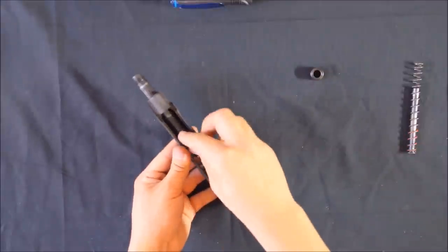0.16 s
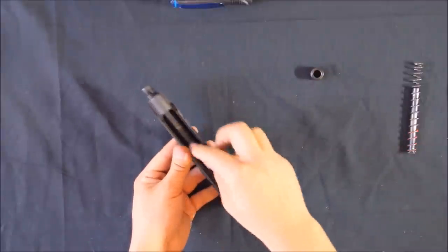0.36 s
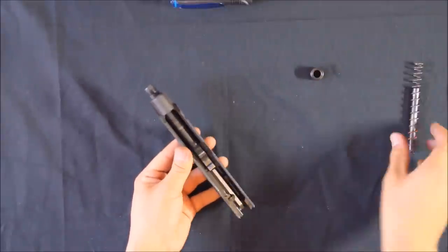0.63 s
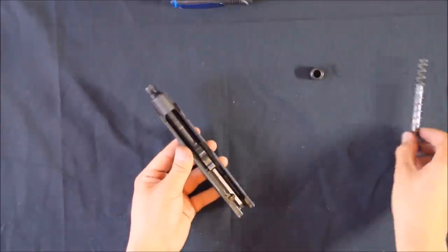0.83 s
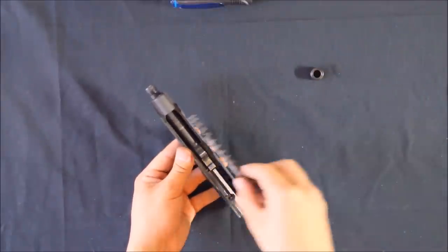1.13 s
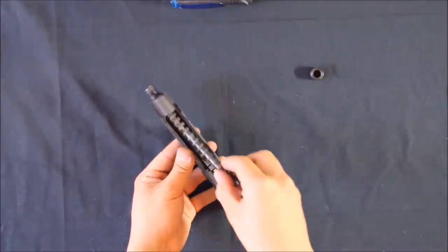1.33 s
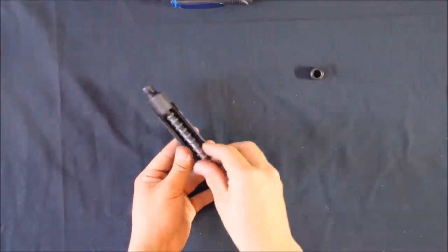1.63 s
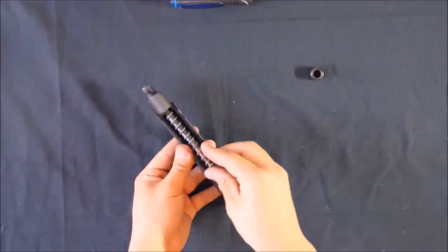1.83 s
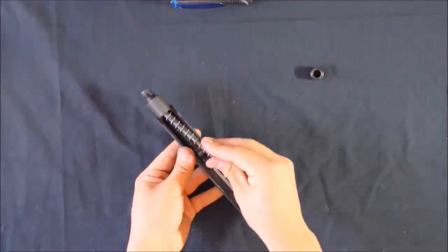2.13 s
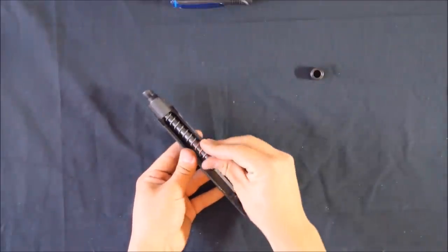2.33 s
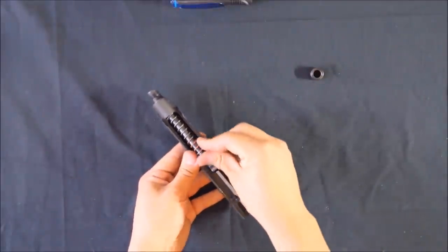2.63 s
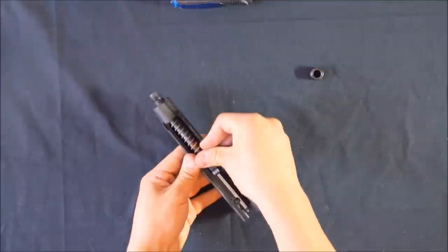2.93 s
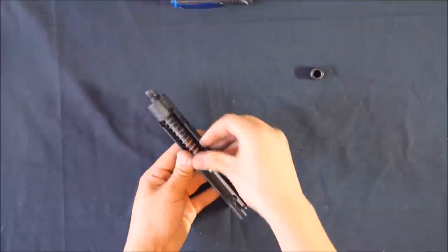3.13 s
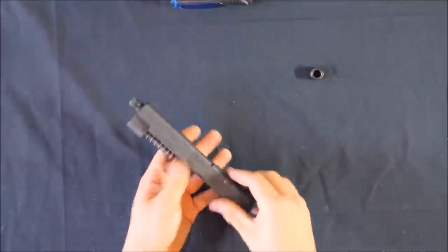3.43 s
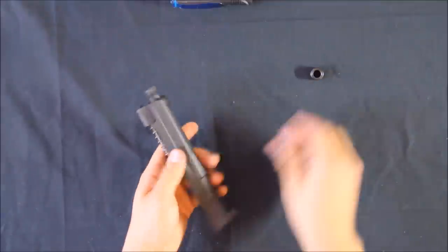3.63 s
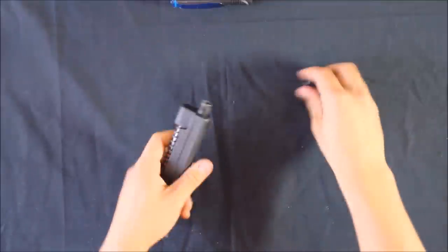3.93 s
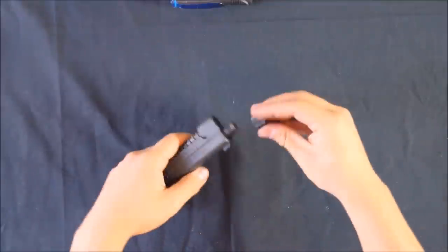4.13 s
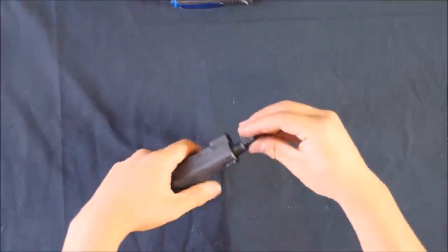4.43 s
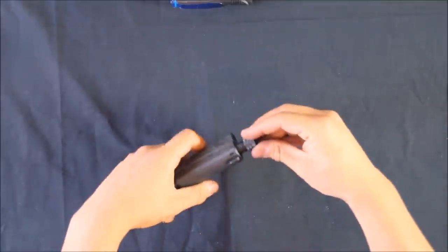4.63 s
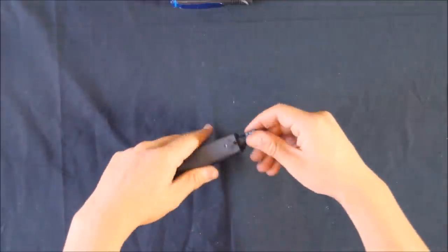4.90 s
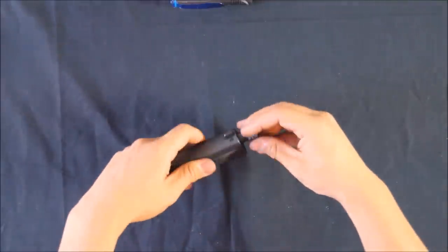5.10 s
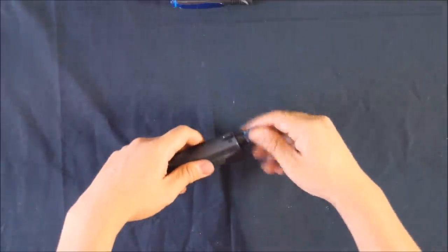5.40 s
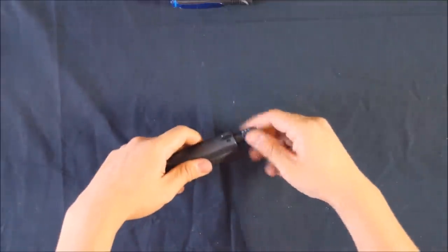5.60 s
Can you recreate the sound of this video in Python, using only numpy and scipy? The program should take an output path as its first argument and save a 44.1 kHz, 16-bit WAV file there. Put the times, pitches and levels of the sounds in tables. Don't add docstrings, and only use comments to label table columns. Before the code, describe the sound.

Close view of hands assembling a steel pistol slide over cloth in a small hard room. A barrel drops and seats in a loud ringing cluster, then quiet; spring scrapes and ticks, a few rod clicks, one very hard snap near three seconds, soft hand rustle, then small cap clicks and faint thread turning. One close microphone, slightly overloaded on the blows, with low room tone.

```python
import sys
import numpy as np
from scipy import signal
from scipy.fft import rfft, irfft, next_fast_len
from scipy.io import wavfile
from scipy.ndimage import uniform_filter1d, map_coordinates

SR = 44100
rng = np.random.default_rng(int(sys.argv[2]) if len(sys.argv) > 2 else 0)


def natural_amplitude(level_db):
    exponent = np.asarray(level_db, float) / 20
    return 10 ** exponent


def wav_out(sig):
    wavfile.write(sys.argv[1], SR, np.round(np.clip(np.atleast_2d(sig).T, -1, 1) * 32767).astype(np.int16))


N = 254016
SPAN = 1 << 14
HZ = np.fft.rfftfreq(SPAN, 1 / SR)

# start in s, peak in dB, tilt in dB, ring in dB.
EARLIER_KNOCK = [
    (-0.063, -13, 0, 7),
]
# start in s, peak in dB, tilt in dB, ring in dB.
BARREL_DROP_HITS = [
    (.1215, -8, 1, 5),
    (.1270, -10.5, 3.5, 13.5),
    (.1505, -27, 1.5, 14),
]
# start in s, peak in dB, tilt in dB, ring in dB.
BARREL_SEAT_HITS = [
    (0.296, -32.5, -3, -2),
    (.3010, -31.5, -4, 0.5),
    (.3040, -15, 0.5, 13.5),
    (.308, -16, 11, 5.5),
    (0.3119, -3.5, 0.1, 10),
    (.317, -9.5, 0.5, 9),
    (0.3247, -6, 0.5, 10),
    (0.370, -20, -5.5, 14),
]
# start in s, peak in dB, tilt in dB, ring in dB.
BARREL_KNOCK_HITS = [
    (.255, -42, -5.5, -6),
    (.4897, -29, 0.5, 6),
    (.504, -37, -5, -19),
    (.553, -47, -3, 2),
]
# start in s, peak in dB, tilt in dB, ring in dB.
SPRING_HITS = [(1.36, -38, 25, 10), (1.3724, -39, 8, 11), (1.4701, -42.5, -6, 10), (1.5198, -45, -4, 10),
               (1.5541, -34, 4, -9), (1.5821, -36, 16, -8), (1.5915, -30, 4, 0)]
# start in s, peak in dB, tilt in dB, ring in dB.
COIL_HITS = [
    (1.7015, -34.5, -2, -4),
    (1.8771, -29, 2.5, -5),
    (1.9558, -39.5, -5.5, -2),
]
# start in s, peak in dB, tilt in dB, ring in dB.
ROD_TOUCH_HITS = [(1.715, -39.5, -7, 10), (2.0209, -28, 2.5, -4), (2.0324, -27.5, -7, 18),
                  (2.0586, -45, -12, 2), (2.2522, -40, -4, -7.5)]
# start in s, peak in dB, tilt in dB, ring in dB.
ROD_PUSH_HITS = [
    (2.2814, -31, -4.5, -7),
    (2.3012, -17, 0.9, 11.5),
    (2.305, -28, 5, 16),
]
# start in s, peak in dB, tilt in dB, ring in dB.
ROD_PRESS_HITS = [
    (2.4422, -35, -4, 6.5),
    (2.7134, -39, -3, -2),
    (2.717, -39, 1.5, -3),
    (2.7217, -24, -1.5, 8),
    (2.7334, -54, 2.5, -4),
]
# start in s, peak in dB, tilt in dB, ring in dB.
ROD_SLIP_HITS = [
    (2.5450, -37.5, 4, 0),
    (2.5468, -16, -3, 5),
    (2.5545, -33, -3, 4),
    (2.5916, -35, -14.5, -1.5),
]
# start in s, peak in dB, tilt in dB, ring in dB.
ROD_SNAP_HITS = [(2.8390, -20.5, -6.5, -0.5), (2.8422, -3.5, 0.5, -6.5), (2.8436, -10, -2.5, -13.5),
                 (2.8450, 4, -2, -2.5), (2.8475, -16.5, -3.5, 4), (2.8500, -3, -2, 3),
                 (2.853, -10, -0.5, 0.5)]
# start in s, peak in dB, tilt in dB, ring in dB.
CAP_HITS = [
    (4.5524, -12, 1.5, 2),
    (4.6255, -53, -2, -3),
    (4.8226, -38.5, -1, 2),
    (4.829, -48, -9, 4),
    (5.3848, -41.5, -6.5, -11),
    (5.4689, -43.5, -7, -15.5),
    (5.5907, -49, -9, -7),
]
# start in s, peak in dB, tilt in dB, ring in dB.
CAP_SCUFF_HITS = [(4.5188, -39, -2, 2), (4.5233, -41, -5, 1), (4.5285, -37, -2, 1), (4.5315, -37, -2, 3),
                  (4.535, -35, 2, 3), (4.539, -36, -9.5, 6), (4.5455, -41, -5, -2)]
# start in s, peak in dB, tilt in dB, ring in dB.
CAP_DROP_HITS = [
    (4.3013, -22, -0.5, 11),
    (4.305, -26, 2.5, -7),
]
# start in s, peak in dB, tilt in dB, ring in dB.
CAP_RATTLE_HITS = [
    (4.3881, -43, -10, 11),
    (4.4178, -36.5, -4, 10),
    (4.4265, -42, -3, 12),
    (4.4432, -34, 2.5, 13),
    (4.6365, -40, 2, 7),
]

# frequency in Hz, width in Hz, level in dB.
SPRING_RESONANCES = [(3880, 130, -30), (5810, 85, -6), (7350, 76, -10), (7970, 36, 4.5), (8580, 120, -17),
                     (9200, 53, -20), (10280, 41, -17), (11000, 48, -22), (12200, 43, -1.5),
                     (13400, 80, -3.5), (14420, 60, -11), (14740, 30, -18), (15600, 200, -16.5)]
# frequency in Hz, width in Hz, level in dB.
PUSH_RESONANCES = [(1210, 41, 0), (2375, 194, -4.5), (2842, 150, -6.5), (3805, 110, -4.5),
                   (4190, 230, -0.5), (6400, 110, -7), (4950, 100, -3), (6940, 180, -6), (7915, 50, 0.5),
                   (8850, 74, -10), (9550, 250, -10), (10120, 49, -7), (10890, 140, -10), (12070, 210, -11),
                   (14600, 100, -11), (15000, 270, -17.5)]
# frequency in Hz, width in Hz, level in dB.
THREAD_RESONANCES = [(7850, 340, -3), (8570, 47, -9), (10500, 43, -2), (12380, 64, -2), (12800, 56, -18.5),
                     (13900, 63, -4), (15300, 66, -8)]
# frequency in Hz, width in Hz, level in dB.
COIL_RESONANCES = [(15400, 300, 4), (15600, 180, 2), (9570, 97, -4), (13300, 200, -14)]
# frequency in Hz, width in Hz, level in dB.
KNOCK_RESONANCES = [(1217, 26, -0.5), (2363, 220, -19), (4250, 65, -4), (13400, 100, -24),
                    (14600, 100, -22.5)]
# frequency in Hz, width in Hz, level in dB.
TOUCH_RESONANCES = [(1790, 120, -9), (2630, 120, -7.5), (3000, 120, 0.5), (3640, 130, -2), (3940, 150, 6),
                    (5870, 100, -25), (7200, 120, -4)]
# frequency in Hz, width in Hz, level in dB.
PRESS_RESONANCES = [(2430, 276, -3.5), (2890, 220, 4), (3700, 120, -4.5), (4270, 200, 1.5), (4940, 180, -6),
                    (7600, 120, -11), (9375, 40, -13.5), (11050, 74, -8.5), (15400, 60, -7.5)]
# frequency in Hz, width in Hz, level in dB.
SCUFF_RESONANCES = [(2340, 44, -9.5), (2950, 67, 3.5), (3790, 120, -0.5), (4190, 140, -2.5),
                    (5570, 230, -13.5), (7230, 180, -11), (8190, 110, -7)]
# frequency in Hz, width in Hz, level in dB.
CAP_DROP_RESONANCES = [(2400, 38, -9), (2980, 60, -3.5), (3740, 146, -2.5), (4200, 80, -13),
                       (5470, 270, -12), (6060, 60, -9), (7100, 80, -7), (8100, 50, -9), (10200, 70, -10),
                       (12100, 120, -3), (13200, 50, -2), (14900, 80, -8)]
# frequency in Hz, width in Hz, level in dB.
RATTLE_RESONANCES = [(2400, 50, -12), (3004, 63, 3), (3580, 200, -5.5), (5940, 190, -13),
                     (7730, 300, -10.5), (12600, 130, -21)]

# frequency [Hz], width [Hz], level [dB].
DROP_MODE_HZ = [1237, 1765, 2340, 2850, 3100, 3830, 4170, 4828, 4875, 4940, 5082, 6170, 6347, 7124, 7270,
                7480, 7970, 8640, 9440, 10400, 11000, 11300, 11500, 12320, 13100, 13400, 14700, 15487]
DROP_MODE_WIDTH_HZ = [40, 30, 110, 100, 120, 50, 84, 40, 40, 45, 30, 30, 30, 40, 50, 90, 35, 45, 60, 50, 30,
                      60, 35, 70, 35, 50, 70, 40]
DROP_MODE_DB = [-27, -9, -18, -12, -12, -13, -12, -0.5, 2.5, -6, -4, -15.5, -9, -12.5, -12, -9.5, -12, -3,
                -24, -17, -15.5, -14, -17, -13, -13, -19.5, -25.5, -16]
# frequency [Hz], width [Hz], level [dB].
SEAT_MODE_HZ = [1210, 1780, 2570, 3020, 3850, 4160, 4242, 4312, 4470, 4828, 4960, 6510, 7130, 7250, 7528,
                7974, 8600, 10350, 11030, 11185, 11450, 12380, 13100, 13400, 15487]
SEAT_MODE_WIDTH_HZ = [40, 40, 80, 55, 50, 40, 34, 25, 50, 40, 60, 50, 50, 30, 36, 40, 50, 150, 60, 50, 90,
                      90, 40, 35, 35]
SEAT_MODE_DB = [-26, -20.5, -24, -20, -14.5, -12, 2, -5.5, -13.5, -11, -9, -25, -9.5, -7.5, -3, -9, -16,
                -21.5, -12, -8.5, -22, -22, -19.5, -17, -19.5]
# frequency [Hz], width [Hz], level [dB].
SNAP_MODE_HZ = [1250, 1770, 2370, 3010, 3640, 3890, 4430, 4970, 5380, 5548, 6230, 7290, 7912, 9430, 11200,
                12230, 13050, 15490]
SNAP_MODE_WIDTH_HZ = [60, 50, 150, 130, 120, 130, 150, 130, 90, 80, 150, 200, 90, 90, 200, 110, 150, 100]
SNAP_MODE_DB = [-13.5, -9, -7, -1, -12, -8, -7.5, -6, -0.5, 5, -8.5, -10, 3.5, -13, -12.5, -10.5, -8.5, -21]
# frequency [Hz], width [Hz], level [dB].
SLIP_MODE_HZ = [1200, 1600, 1765, 2030, 2336, 2560, 2815, 3172, 3350, 3745, 3980, 4200, 4955, 6170, 7200,
                7900, 8620, 11030, 12250, 13250]
SLIP_MODE_WIDTH_HZ = [40, 28, 25, 30, 90, 40, 160, 50, 50, 60, 45, 130, 90, 50, 120, 130, 50, 50, 120, 80]
SLIP_MODE_DB = [-16, -6.5, 0, -11, -6.5, -3.5, -1.5, -1, -9.5, -8.5, -7.5, -4, -8, -10.5, -17.5, -14, -24.5,
                -20, -19, -23.5]
# frequency [Hz], width [Hz], level [dB].
CAP_MODE_HZ = [2370, 3030, 3820, 4090, 4320, 6610, 7140, 7560, 9260, 10300, 11200, 12200, 13200, 14700]
CAP_MODE_WIDTH_HZ = [60, 90, 220, 60, 100, 140, 70, 80, 120, 120, 80, 220, 80, 300]
CAP_MODE_DB = [-6, -6, -1, -15, -3, -12, -18, -17, -16, -20, -11, -9, -12, -15]
# frequency [Hz], width [Hz], level [dB].
EARLIER_MODE_HZ = [1250, 2550, 2800, 2930, 4255, 4860, 6820, 7730, 8000, 8550, 11200, 13000]
EARLIER_MODE_WIDTH_HZ = [23, 80, 40, 90, 40, 300, 260, 100, 40, 60, 45, 49]
EARLIER_MODE_DB = [-11, -8.5, -9, -12, -1.5, -12.5, -15.5, -14, -16, -19, -21.5, -18.5]
DROP_RESONANCES = np.transpose([DROP_MODE_HZ, DROP_MODE_WIDTH_HZ, DROP_MODE_DB])
SEAT_RESONANCES = np.transpose([SEAT_MODE_HZ, SEAT_MODE_WIDTH_HZ, SEAT_MODE_DB])
SNAP_RESONANCES = np.transpose([SNAP_MODE_HZ, SNAP_MODE_WIDTH_HZ, SNAP_MODE_DB])
SLIP_RESONANCES = np.transpose([SLIP_MODE_HZ, SLIP_MODE_WIDTH_HZ, SLIP_MODE_DB])
CAP_RESONANCES = np.transpose([CAP_MODE_HZ, CAP_MODE_WIDTH_HZ, CAP_MODE_DB])
EARLIER_RESONANCES = np.transpose([EARLIER_MODE_HZ, EARLIER_MODE_WIDTH_HZ, EARLIER_MODE_DB])

# frequency in Hz, level in dB.
STEEL_CRACK = [(470, -95), (800, -57), (1260, -29), (2320, -13), (3420, -6), (3930, -5.5), (9940, -13),
               (12600, -12), (16000, -17)]
# frequency in Hz, level in dB.
BARREL_DROP_CRACK = [(500, -72.5), (900, -38.5), (1700, -18), (3100, -2.5), (4600, -10), (6000, -9),
                     (12000, -20.5), (16000, -42.5)]
# frequency in Hz, level in dB.
BARREL_SEAT_CRACK = [(500, -60.5), (900, -32), (1500, -15), (2600, -2), (4400, -8), (6500, -2.5),
                     (12000, -27), (16000, -29)]
# frequency in Hz, level in dB.
SPRING_BODY_CRACK = [(1500, -8.5), (3000, -28), (6000, 3), (10000, -6), (14000, 3), (16000, -16)]
# frequency in Hz, level in dB.
COIL_BODY_CRACK = [(1500, -40), (4000, -12), (10000, -16), (13000, -14), (15000, -11), (16500, 0)]
# frequency in Hz, level in dB.
ROD_TOUCH_CRACK = [(800, -50), (1500, -8), (3500, 0), (6000, 1.5), (9000, -15), (12000, -50)]
# frequency in Hz, level in dB.
ROD_SLIP_CRACK = [(470, -67), (800, -38.5), (1740, -12), (3510, -1), (3830, -5), (5580, -5), (10700, -26.5),
                  (16000, -32.5)]
# frequency in Hz, level in dB.
CAP_BODY_CRACK = [(900, -25), (1600, -54), (2400, -0.5), (3500, -8.5), (5000, -4.5), (9000, -6),
                  (16000, -12)]

# peak in seconds, length in seconds, peak in dB.
BARREL_STROKES = [
    (.385, 0.17, -31.5),
    (.47, 0.14, -45.5),
]
# peak in seconds, length in seconds, peak in dB.
SPRING_STROKES = [
    (1.376, 0.59, -57),
    (1.56, 0.11, -44),
    (1.592, 0.036, -46),
    (1.47, .06, -56),
]
# peak in seconds, length in seconds, peak in dB.
ROD_STROKES = [
    (2.3, 0.073, -41.5),
]
# peak in seconds, length in seconds, peak in dB.
CAP_STROKES = [
    (4.534, 0.051, -30.5),
]
# peak in seconds, length in seconds, peak in dB.
RATTLE_STROKES = [
    (4.432, 0.066, -45.5),
    (4.385, .16, -50.5),
]
# peak in seconds, length in seconds, peak in dB.
THREAD_STROKES = [
    (4.9, 0.084, -61.5),
    (5.06, 0.52, -61),
    (5.388, 0.031, -58),
    (5.424, 0.11, -57.5),
    (5.646, 0.084, -61.5),
]
# start in seconds, level in dB, rise in seconds, lowest Hz.
AIR_PUSHES = [
    (0.3123, -10.5, 0.000089, 489),
    (2.8452, -8.5, 0.00016, 350),
]
# frequency in Hz, t60 in seconds.
ROOM_T60 = [(1000, 0.43), (1800, 0.6), (3000, 0.6), (6000, 0.54), (9000, 0.38), (13000, 0.34),
            (16000, 0.11)]
# peak in seconds, length in seconds, peak in dB.
HAND_STROKES = [
    (3.244, 0.42, -57),
    (3.532, 0.32, -61),
    (3.872, 0.23, -52),
    (4.004, 0.072, -68),
]
# frequency in Hz, density in dB per Hz.
ROOM_TONE = [(53, -39), (90, -15.5), (145, -5.5), (173, -7), (333, -3.5), (405, -8.5), (442, -5.5),
             (472, -9.5), (869, -16.5), (1010, -15.5), (2320, -18.5), (2590, -21.5), (5670, -22.5),
             (15100, -31), (16500, -50)]
# frequency in Hz, width in Hz, level in dB.
MACHINE_HUMS = [(142, 14, -69.5), (352, 32, -71.5), (438.7, 6.8, -69), (66.5, 9.9, -72), (51.3, 8.8, -76.5)]
# peak in seconds, length in seconds, peak in dB.
RUMBLE_GUSTS = [
    (5.35, .7, -69),
    (3.07, 0.56, -68.5),
    (3.85, 0.56, -74),
]
# lowest Hz, threshold in dB, list of times in seconds.
THINNED_BLOCKS = [(3140, 2.5, [1.028, 1.152, 1.79, 3.858, 5.138]), (9500, 5, [4.543]), (5340, 4.5, [2.748]),
                  (4200, 3, [4.392, 4.458]), (5230, 2.5, [2.322, 2.39, 2.554, 2.622, 3.005])]
# frequency in Hz, gain in dB.
CAMERA_BAND = [(15680, 0), (15850, -24), (16700, -40)]


def parts():
    # contacts, modes, crack, chatter t60 in s, level sent to the room in dB.
    steps = [(EARLIER_KNOCK, EARLIER_RESONANCES, BARREL_DROP_CRACK, .03, -3),
             (BARREL_SEAT_HITS, SEAT_RESONANCES, BARREL_SEAT_CRACK, .028, -3.5),
             (BARREL_DROP_HITS, DROP_RESONANCES, BARREL_DROP_CRACK, .04, -6),
             (BARREL_KNOCK_HITS, KNOCK_RESONANCES, BARREL_SEAT_CRACK, .06, -13),
             (SPRING_HITS, SPRING_RESONANCES, SPRING_BODY_CRACK, .012, -3),
             (COIL_HITS, COIL_RESONANCES, COIL_BODY_CRACK, .006, -1.5),
             (ROD_TOUCH_HITS, TOUCH_RESONANCES, ROD_TOUCH_CRACK, .007, -6),
             (ROD_PUSH_HITS, PUSH_RESONANCES, ROD_SLIP_CRACK, .012, -3),
             (ROD_SLIP_HITS, SLIP_RESONANCES, ROD_SLIP_CRACK, .005, -4),
             (ROD_PRESS_HITS, PRESS_RESONANCES, STEEL_CRACK, .012, -4.5),
             (ROD_SNAP_HITS, SNAP_RESONANCES, STEEL_CRACK, .006, -4),
             (CAP_HITS, CAP_RESONANCES, CAP_BODY_CRACK, .012, -5),
             (CAP_SCUFF_HITS, SCUFF_RESONANCES, CAP_BODY_CRACK, .04, -6),
             (CAP_DROP_HITS, CAP_DROP_RESONANCES, CAP_BODY_CRACK, .02, -5),
             (CAP_RATTLE_HITS, RATTLE_RESONANCES, CAP_BODY_CRACK, .015, -6)]
    blows = sum(clicks(*step) for step in steps)
    spring = scrape(SPRING_STROKES, SPRING_RESONANCES, rise=0.115, broad_db=-8.5, rough_db=0.5)
    rod = scrape(ROD_STROKES, SLIP_RESONANCES, rise=0.58, broad_db=0.5, rough_db=4.5)
    cap = scrape(CAP_STROKES, SCUFF_RESONANCES, rise=0.44, broad_db=-12.0, rough_db=-5.0)
    rattle = scrape(RATTLE_STROKES, RATTLE_RESONANCES, rise=0.66, broad_db=-14, rough_db=0.0)
    thread = scrape(THREAD_STROKES, THREAD_RESONANCES, rise=0.41, broad_db=1, rough_db=5.0)
    barrel = scrape(BARREL_STROKES, SEAT_RESONANCES, rise=.3, broad_db=-9.5, rough_db=0)
    return blows + barrel + spring + rod + rattle + cap + thread


def clicks(contacts, modes, body, chatter, room_db):
    t = np.arange(4096) / SR
    near = np.zeros((2, N + 2 * SPAN))
    bass_cut = 1 + (900 / (HZ + 1)) ** 4
    ring = unit(ringing(modes, HZ) / bass_cut)
    crack = unit(natural_amplitude(along(body, HZ)))
    jolts = rng.standard_normal((8, len(t)))
    for (s, db, treble_db, ring_db), jolt in zip(contacts, jolts):
        burst = rfft(jolt * natural_amplitude(-60 * t / max(chatter, .001)), SPAN)
        even = irfft(burst / (np.abs(unit(burst)) + 0.31))[:len(t)]
        tilt = natural_amplitude(treble_db * np.log2((HZ + 600) / 5000))
        response = causal(tilt * np.hypot(natural_amplitude(ring_db) * ring, crack))
        blow = irfft(rfft(even, SPAN) * response)
        at = round(s * SR) + SPAN
        near[:, at:at + SPAN] += natural_amplitude([[db], [db + room_db]]) * blow / np.abs(blow).max()
    first = round(contacts[0][0] * SR) + SPAN
    echoes = signal.fftconvolve(near[1, first:at + SPAN], room_tail())
    far = np.pad(echoes, (first, N))
    return near[0, SPAN:SPAN + N] + far[SPAN:SPAN + N]


def scrape(rows, modes, rise, broad_db, rough_db):
    def colour(f):
        crack = unit(natural_amplitude(along(STEEL_CRACK, f)))
        return np.hypot(unit(ringing(modes, f)), natural_amplitude(broad_db) * crack)

    rub = strokes(rows, rise) * noise(colour, rough_db)
    return rub + natural_amplitude(-7.5) * signal.fftconvolve(rub, room_tail())[:N]


def ringing(modes, f):
    return np.sqrt(sum(natural_amplitude(2 * db) * (f * w) ** 2 / ((c * c - f * f) ** 2 + (f * w) ** 2)
                       for c, w, db in modes))


def thumps():
    out = np.zeros(N)
    t = np.arange(2048) / SR
    for s, db, rise, low_hz in AIR_PUSHES:
        push = t / rise * np.exp(-t / rise)
        pole = np.exp(-2 * np.pi * low_hz / SR)
        puff = signal.lfilter([1, -1], [1, -pole], push)
        out[round(s * SR):][:len(t)] += natural_amplitude(db) * puff
    return out


def room_tail():
    hz, t, z = signal.stft(rng.standard_normal(2 * SPAN), SR, nperseg=256)
    decay = natural_amplitude(-60 * t / along(ROOM_T60, hz)[:, None])
    tail = signal.istft(z * decay, SR, nperseg=256)[1]
    t = np.arange(len(tail)) / SR
    onset = 1 - np.exp(-t / 0.00063)
    early = 1 + 1.6 * np.exp(-t / 0.03)
    z = rfft(tail * onset * early)
    power = np.abs(z) ** 2
    lumps = uniform_filter1d(power, size=30) / uniform_filter1d(power, size=600)
    gain = np.interp(HZ, np.fft.rfftfreq(len(tail), 1 / SR), np.abs(lumps) ** -.5)
    flatten = irfft(causal(gain))[:SPAN // 4]
    tail = signal.fftconvolve(irfft(z), flatten)[:len(tail)]
    return tail / np.linalg.norm(tail)


def hands():
    rustle = noise(lambda f: f / 300 / (1 + (f / 300) ** 2) / (1 + (f / 2500) ** 2), rough_db=0.5)
    hiss = noise(lambda f: 1 / (1 + (6000 / (f + 1)) ** 3), rough_db=5.5)
    return strokes(HAND_STROKES, rise=0.25) * (rustle + natural_amplitude(-7.5) * hiss)


def background():
    tone_level = natural_amplitude(-60.5 + .7 * wobble(8))
    tone = tone_level * noise(lambda f: natural_amplitude(along(ROOM_TONE, f)))
    gusts = natural_amplitude(-73.5 + 4.5 * wobble(3.5)) + strokes(RUMBLE_GUSTS, rise=0.58)
    rumble = gusts * noise(lambda f: (f > 22) / (1 + (f / 90) ** 4) * f / (f + 40))
    hums = sum(natural_amplitude(db) * noise(lambda f: 1 / (1 + (2 * (f - c) / w) ** 2)) for c, w, db in MACHINE_HUMS)
    return tone + rumble + hums


def strokes(rows, rise):
    t = np.arange(N) / SR
    rise = np.clip(rise, .02, .98)
    gain = 0
    for s, length, db in rows:
        away = np.maximum((s - t) / rise, (t - s) / (1 - rise)) / length
        gain = gain + natural_amplitude(db - 25 * np.minimum(away, 4))
    return gain


def noise(gain, rough_db=0):
    grit = rng.standard_normal(N) * natural_amplitude(rough_db * wobble(400))
    return unit(irfft(rfft(grit) * gain(np.fft.rfftfreq(N, 1 / SR)), N))


def wobble(rate):
    knots = rng.standard_normal(int(N * rate / SR) + 4)
    return map_coordinates(knots, [np.arange(N) * rate / SR])


def causal(gain):
    cepstrum = irfft(np.log(gain + 1e-6))
    fold = np.r_[1, 2 * np.ones(SPAN // 2 - 1), np.zeros(SPAN // 2)]
    return np.exp(rfft(cepstrum * fold))


def along(points, hz):
    f, v = np.transpose(points)
    return np.interp(np.log(hz + 1), np.log(f + 1), v)


def unit(x):
    return x / np.sqrt(np.mean(np.abs(x) ** 2) + 1e-20)


def scene():
    return (parts() + thumps() + hands() + background())[None]


def lagged_mean(x, seconds, lag):
    keep = np.exp(-1 / (seconds * SR))
    mean = signal.lfilter([1 - keep], [1, -keep], x)
    return np.pad(mean, ((0, 0), (lag, 0)))[:, :N]


def thin_weak_bands(x):
    out, size = x.copy(), 1536
    window = np.hanning(size)
    hz = np.fft.rfftfreq(size, 1 / SR)
    for lowest_hz, over_db, times in THINNED_BLOCKS:
        for s in times:
            middle = round(s * SR)
            at = slice(middle - size // 2, middle + size // 2)
            z = rfft(x[0, at] * window)
            band = uniform_filter1d(np.abs(z), size=9)
            around = uniform_filter1d(np.abs(z), size=90)
            weak = (hz > lowest_hz) & (band < natural_amplitude(over_db - 2.5) * around)
            out[0, at] -= irfft(z * weak)
    return out


def roll_off(x):
    return signal.sosfilt(signal.butter(12, 16780, fs=SR, output="sos"), x)


def record(dry):
    top = np.where(dry > 0, .62, .54)
    x = dry / (1 + np.abs(dry / top) ** 6) ** (1 / 6)
    overload = lagged_mean(np.clip(np.abs(x) - .24, 0, None), seconds=.13, lag=90)
    x = x / (1 + 500 * overload)
    bass = signal.sosfilt(signal.butter(2, 930, fs=SR, output='sos'), x)
    treble = lagged_mean(np.abs(x - bass), seconds=0.12, lag=260)
    x = x - bass * (1 - 1 / (1 + 36 * treble))
    m = next_fast_len(N)
    band_gain = natural_amplitude(along(CAMERA_BAND, np.fft.rfftfreq(m, 1 / SR)))
    x = irfft(rfft(x, m) * band_gain, m)[:, :N]
    mix = thin_weak_bands(x)
    return roll_off(mix)


dry = scene()
out = record(dry)
wav_out(out)
```